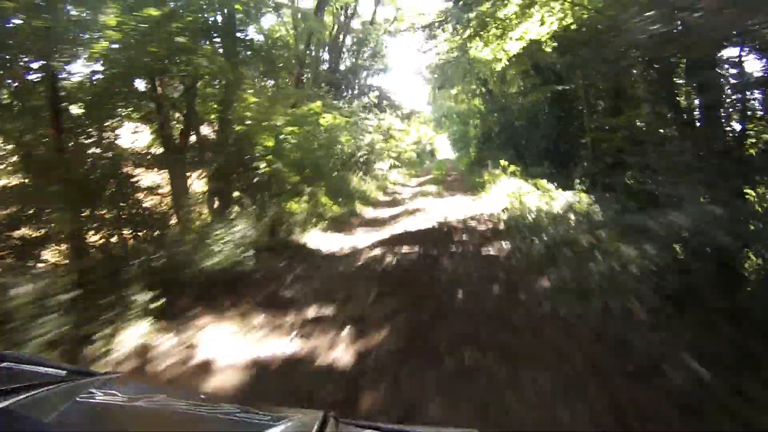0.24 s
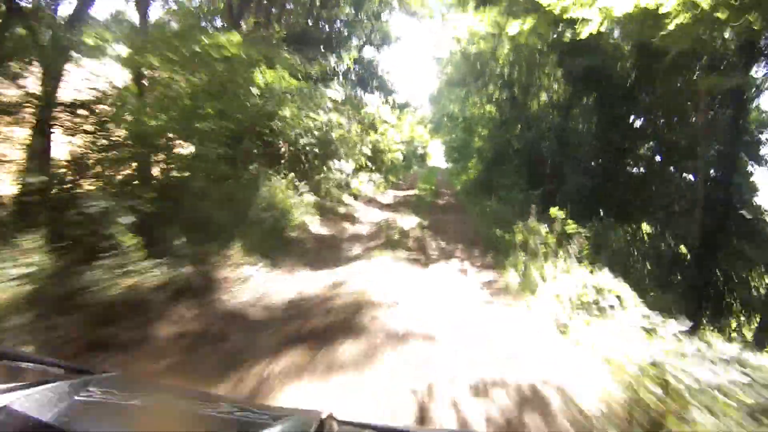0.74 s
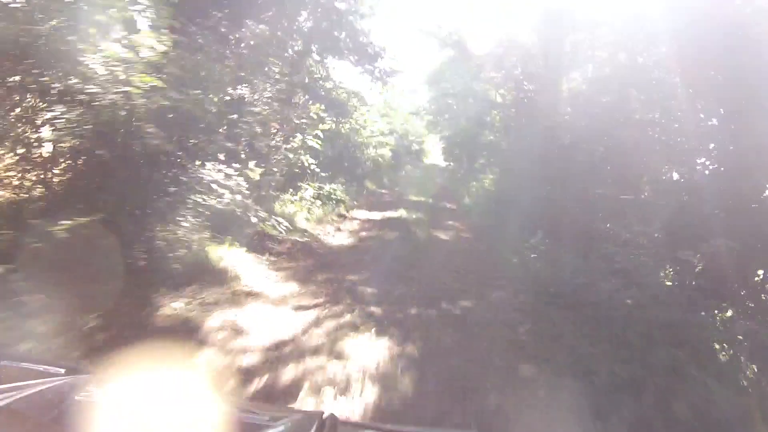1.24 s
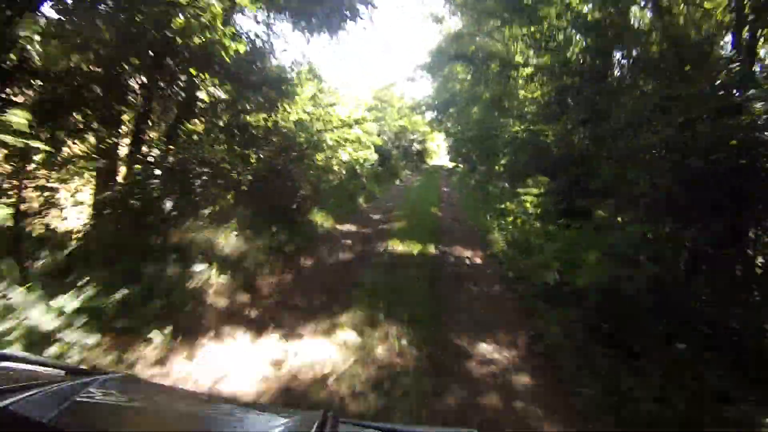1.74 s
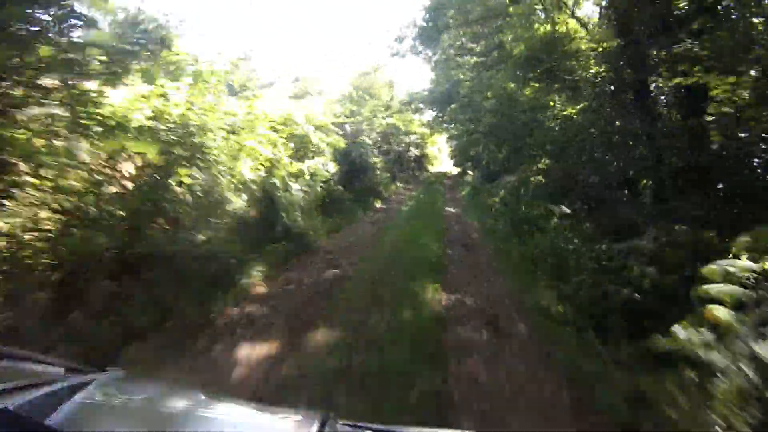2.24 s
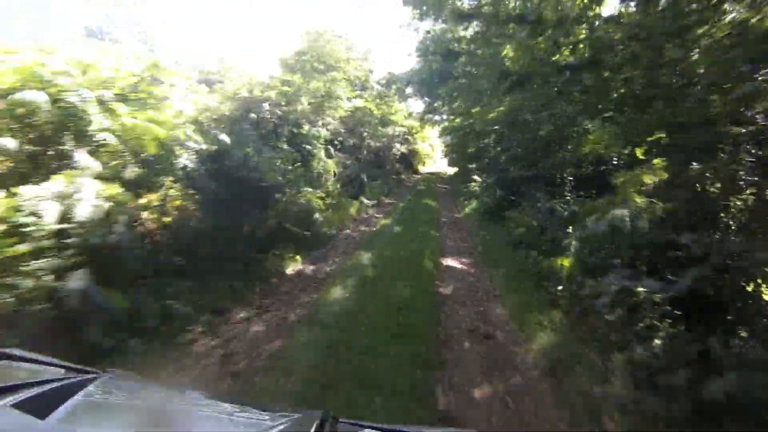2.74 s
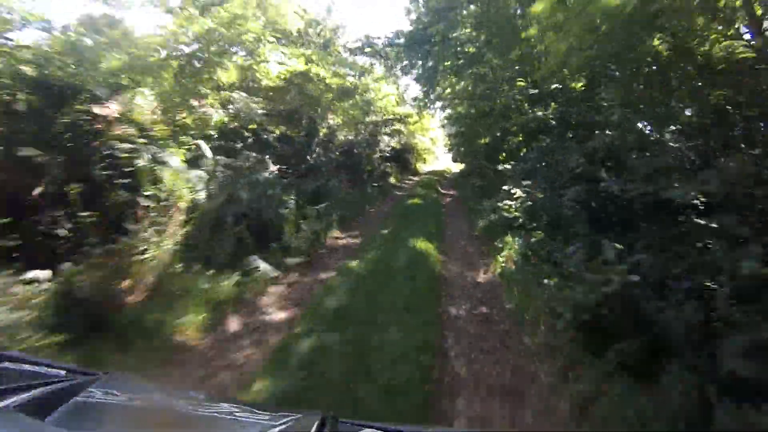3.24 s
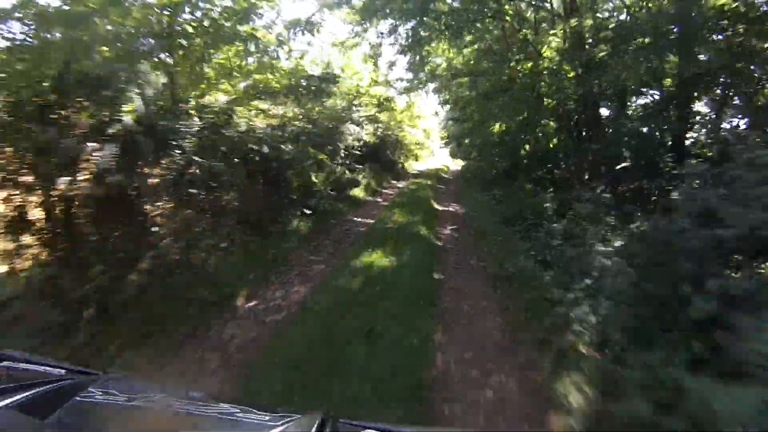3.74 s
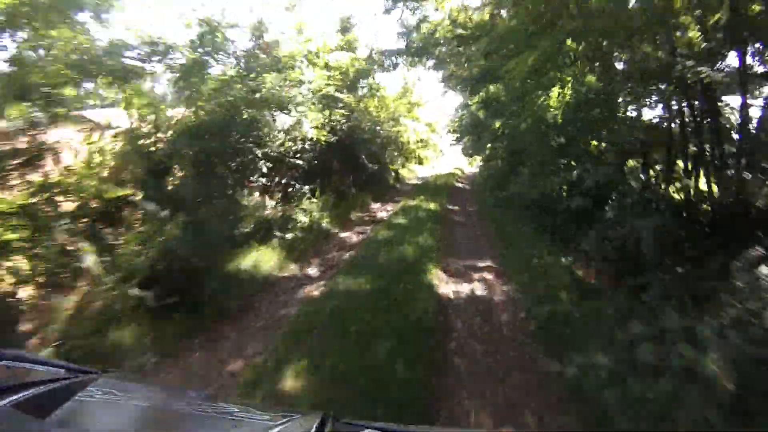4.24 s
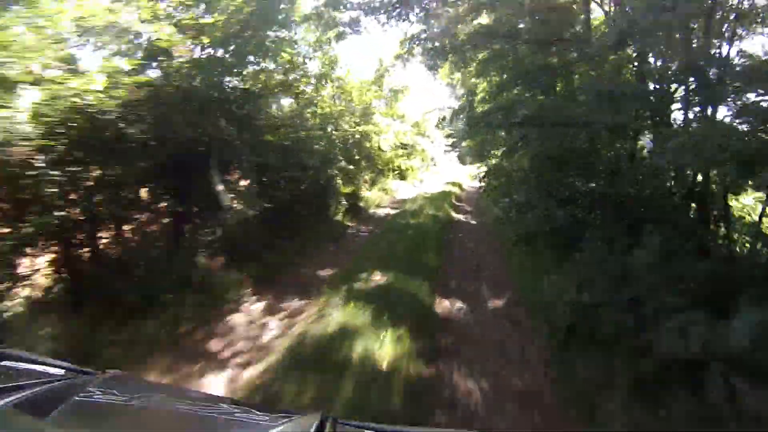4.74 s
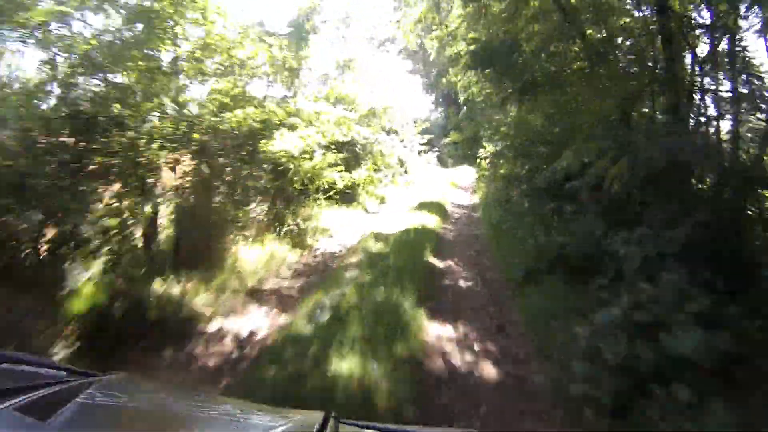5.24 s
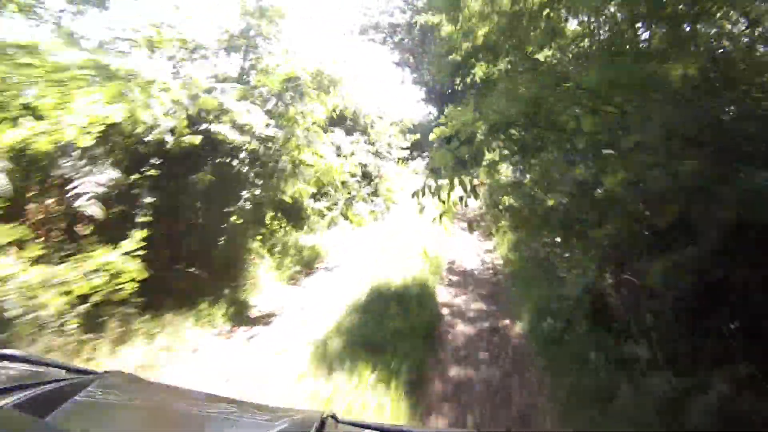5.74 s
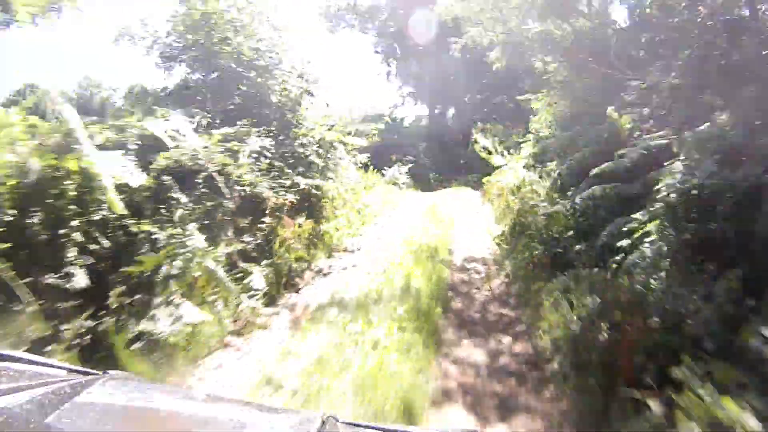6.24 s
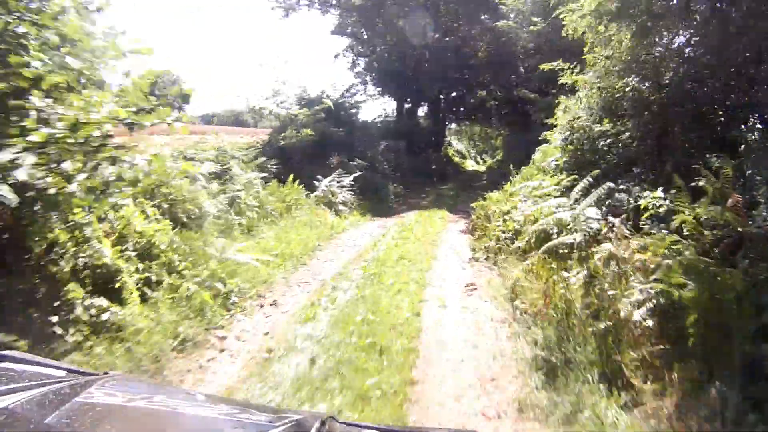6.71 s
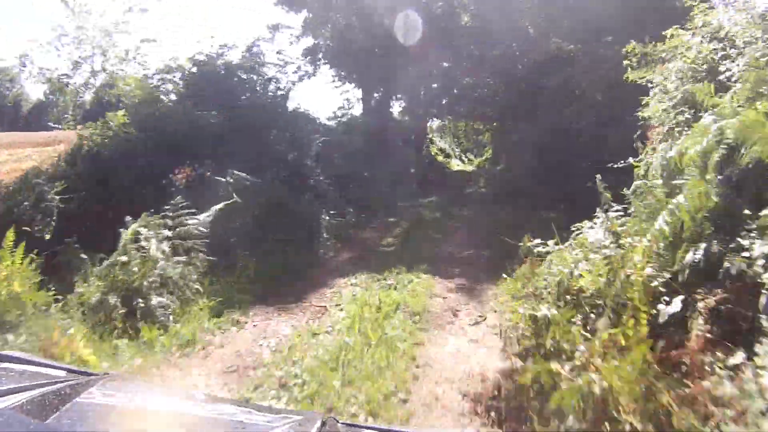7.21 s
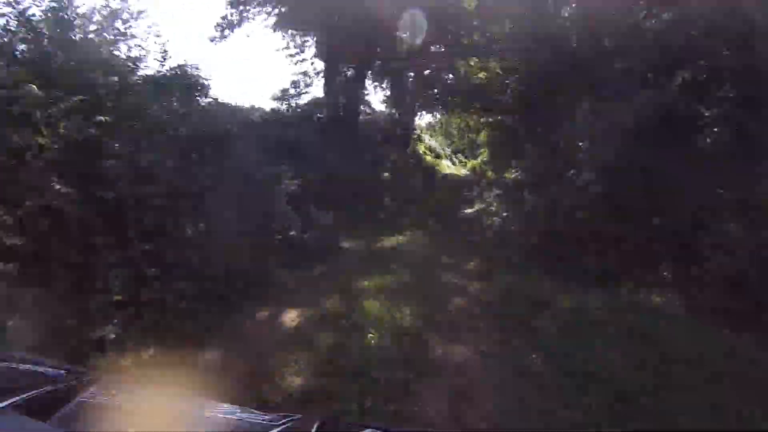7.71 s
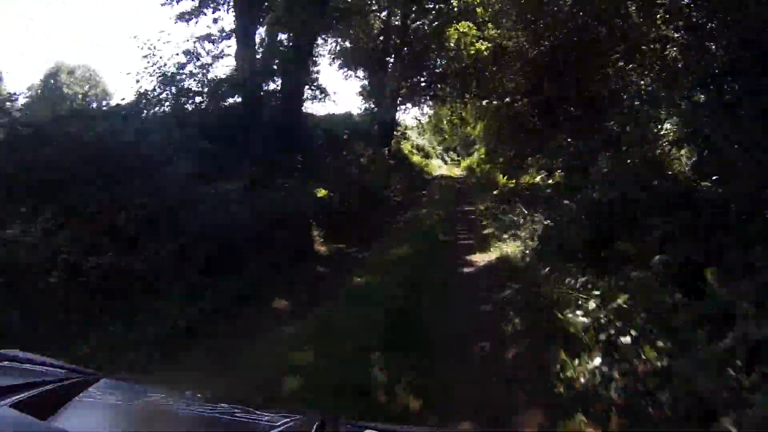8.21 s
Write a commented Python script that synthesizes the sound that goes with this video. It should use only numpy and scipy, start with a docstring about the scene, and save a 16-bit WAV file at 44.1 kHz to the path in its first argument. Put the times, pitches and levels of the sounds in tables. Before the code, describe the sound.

From on board an off-road vehicle on a rutted dirt track, a rough twin engine throbs close by, with a hollow bark, sheet-metal buzz, steady mechanical clatter and a gliding whine. At 0.3 and 0.6 s the suspension clunks hard as the throttle sound wavers. The engine then climbs until about 2.8 s, over deep body sway, tyre rumble and gritty ticks. Thuds and knocks cluster at 3.4 to 3.8 s while the revs fall; the engine dips quieter near 4 s and labours low until 5.2 s. Loose fittings tap at 1.1, 1.8, 5.3 and 6.5 s. Revs rise again, and at 5.9 s a very loud burst of hard clacks strikes beside the microphone; the rest ducks, then swells back over roughly a second. Further bumps and a stone tick come around 7.7 s as the engine pulls higher and louder until 8.5 s.

```python
"""The twin engine of an off-road vehicle on a dirt track, heard on board, turns at 30 to 43 cycles a second.
Its firings ring the pipe and sheet metal, low orders boom in the cab, high orders whine, the mechanism clatters.
The ground sways and jolts the body, the suspension clunks, fittings rattle and the tyres crunch grit:
filtered noise and decaying sines.
A hard clack close to the microphone makes the gain control duck, then recover."""
import sys
import numpy as np
from scipy import signal
from scipy.fft import rfft, irfft, next_fast_len
from scipy.io import wavfile
from scipy.ndimage import uniform_filter1d, minimum_filter1d, map_coordinates

SR = 44100
rng = np.random.default_rng(int(sys.argv[2]) if len(sys.argv) > 2 else 0)


def transcribe(signal):
    """Save signal, clipped to [-1, 1], as a 16-bit WAV file at the path in sys.argv[1]."""
    frames = np.atleast_2d(signal).T
    limited = np.clip(frames, -1, 1)
    pcm = np.round(limited * 32767).astype(np.int16)
    wavfile.write(sys.argv[1], SR, pcm)


N = 373514

# spectrum of clattering metal: hz, level_db (relative)
CLATTER_SPECTRUM = [(300, -9), (560, -3.5), (820, 2), (980, -3.5), (1130, -7), (1270, -6), (1380, 6.5),
                    (1950, -4), (3450, 0), (3900, -16), (4350, -6.5), (4900, -20.5), (5900, -15.5),
                    (7700, -27), (8800, -35.5), (13500, -42.5), (15000, -63)]


def amp(db):
    """Decibels to gain."""
    return 10 ** (np.asarray(db) / 20)


def unit(x):
    """Scale to rms 1."""
    return x / np.sqrt(np.mean(x ** 2) + 1e-20)


def curves(rows):
    """One value per sample for each column after the time."""
    s, *cols = np.transpose(rows)
    return [np.interp(np.arange(N) / SR, s, c) for c in cols]


def wobble(rate):
    """A smooth random curve through normal deviates, rate knots a second."""
    knots = rng.standard_normal(int(N * rate / SR) + 4)
    return map_coordinates(knots, [np.arange(N) * rate / SR])


def filtered(x, response):
    """x times a complex response of frequency."""
    m = next_fast_len(len(x) + SR // 2)
    spectrum = rfft(x, m) * response(np.fft.rfftfreq(m, 1 / SR))
    return irfft(spectrum, m)[:len(x)]


def coloured(x, points):
    """x through a (Hz, dB) spectrum, at rms 1."""
    hz, db = np.transpose(points)
    return unit(filtered(x, lambda f: amp(np.interp(np.log(f + 1), np.log(hz), db))))


def resonate(x, modes, order=1):
    """x through parallel (Hz, width Hz, dB) resonances, at rms 1; a higher order steepens their skirts."""
    def peak(f, hz, width_hz):
        return (1j * f * width_hz / (hz * hz - f * f + 1j * f * width_hz)) ** order

    return unit(filtered(x, lambda f: sum(amp(db) * peak(f, hz, width_hz) for hz, width_hz, db in modes)))


def noise():
    """White noise."""
    return rng.standard_normal(N)


def add(track, s, sound):
    """Mix a sound into the track at time s."""
    part = track[round(s * SR):][:len(sound)]
    part += sound[:len(part)]


def fade(t60):
    """A quarter second of exponential decay, losing 60 dB in t60 seconds."""
    return np.exp(-np.log(1000) * np.arange(SR // 4) / SR / t60)


def tone(hz):
    """A quarter second of a sine."""
    return np.sin(2 * np.pi * hz * np.arange(SR // 4) / SR)


def rolling():
    """Tyre noise: coloured noise of wandering level."""
    # hz, level_db (relative)
    tyre_spectrum = [(20, -9), (45, 11), (180, -1.5), (330, -4.5), (430, -17), (700, -9.5), (1150, -17),
                     (3000, -17), (5000, -35.5), (14000, -78)]
    return amp(-27.5 + 3.2 * wobble(7.6)) * coloured(noise(), tyre_spectrum)


def grit():
    """Grains thrown in flurries and single stones on the underside: short decays of bright noise."""
    # hz, level_db (relative)
    grit_spectrum = [(500, -25), (2500, 19), (4500, 0.5), (8000, 1), (13300, -4), (15300, -33)]
    # stones: start_s, level_db (relative)
    stones = [(0.4648, -43), (0.5477, -37), (0.5561, -36), (0.7043, -39), (0.7916, -43), (0.8036, -37),
              (1.0096, -43), (1.1054, -42), (1.1812, -36), (1.2645, -41), (1.3688, -38), (1.695, -35),
              (2.2099, -43), (2.5147, -43), (3.0849, -38), (3.3124, -42), (3.4101, -42), (3.4516, -41),
              (3.4994, -39), (3.7075, -39), (3.7299, -36), (3.7898, -41), (3.8372, -33), (4.1704, -41),
              (4.7551, -43), (4.768, -42), (4.781, -41), (4.788, -42), (4.9322, -40), (5.1447, -42),
              (5.1524, -40), (5.2315, -42), (7.0524, -39), (7.3652, -43), (7.456, -41), (7.7179, -31),
              (8.0781, -42), (8.2936, -43)]
    grains_per_s = 70 * amp(4 * wobble(4))
    size_db = np.minimum(5.5 * rng.exponential(size=N), 12)
    grains = (rng.random(N) < grains_per_s / SR) * amp(size_db)
    ticks = amp(-52) * signal.fftconvolve(grains, fade(t60=.009))[:N]
    for s, db in stones:
        add(ticks, s, amp(db + 7) * fade(t60=.013))
    return ticks * coloured(noise(), grit_spectrum)


def ping():
    """A brief high ping: one decaying sine."""
    # start_s, pitch_hz, peak_db, t60_s
    s, hz, db, t60 = (.207, 9300, -45, .08)
    track = np.zeros(N)
    add(track, s, amp(db) * fade(t60=t60) * tone(hz))
    return track


def rattles():
    """Each loose fitting taps once: a short ring with a little scrape."""
    # start_s, level_db (before the rise), ring_hz
    taps = [(1.085, -18, 3070), (1.765, -14, 1410), (5.311, -14, 1370), (6.421, -17, 1400),
            (6.575, -16, 2800)]
    rings, scrapes = np.zeros((2, N))
    for s, db, hz in taps:
        blow = amp(db) * (1 - fade(t60=.004)) * fade(t60=.035)
        add(rings, s, blow * tone(hz))
        add(scrapes, s, blow)
    return rings + .5 * scrapes * coloured(noise(), CLATTER_SPECTRUM)


def clunks():
    """The suspension hits its stop: short hard bursts of resonant noise."""
    # start_s, level_db (before the rise)
    stops = [(0.32, -16), (.618, -19)]
    # mode_hz, width_hz, level_db (relative)
    clunk_modes = [(300, 84, -0.5), (540, 180, -6), (1400, 410, -14)]
    blows = np.zeros(N)
    for s, db in stops:
        add(blows, s, amp(db) * (1 - fade(t60=0.0052)) * fade(t60=0.078))
    return blows * resonate(noise(), clunk_modes, order=2)


def body_sway():
    """The lowest body mode swings on at a wandering frequency and swells at each bump in the track."""
    # crest_s, level_db (relative), length_s at half height
    bumps = [(0.074, -13, 0.057), (0.31, -10, 0.11), (0.727, -9.5, 0.12), (0.924, -9.5, 0.05),
             (1.212, -9.5, 0.22), (1.443, -14.5, 0.16), (1.728, -9, 0.29), (2.046, -11.5, 0.19),
             (2.288, -9, 0.1), (2.6, -14, 0.06), (2.79, -13.5, 0.065), (2.932, -12, 0.039),
             (3.07, -8, 0.094), (3.345, -9.5, 0.037), (3.587, -8.5, 0.052), (3.886, -4, 0.083),
             (4.188, -11.5, 0.057), (4.317, -15.5, 0.068), (4.456, -10.5, 0.098), (4.605, -13, 0.11),
             (4.905, -8.5, 0.15), (5.148, -9.5, 0.085), (5.45, -8.5, 0.18), (5.755, -10.5, 0.068),
             (5.88, -13, 0.035), (6.133, -10.5, 0.19), (6.37, -13, 0.098), (6.574, -8, 0.068),
             (7.11, -10, 0.096), (7.366, -18, 0.1), (7.516, -9, 0.14), (7.706, -7.5, .06),
             (7.824, -6, 0.08), (7.972, -10, 0.043), (8.428, -11.5, 0.22)]
    t = np.arange(N) / SR
    swells = sum(amp(db) * .5 ** ((2 * (t - s) / length_s) ** 2) for s, db, length_s in bumps)
    steady = amp(-22.5 + 3 * wobble(6.5))
    swing_hz = 38.5 + 3.51 * wobble(12)
    swing = np.sin(2 * np.pi * np.cumsum(swing_hz) / SR)
    rumble = 0.29 * resonate(noise(), [(33.1, 25.6, 0)], order=3)
    return amp(1.0) * np.hypot(swells, steady) * (swing + rumble)


def shaking():
    """The ground's roughness drives the cab air and the body panels, resonances fed with noise."""
    # time_s, cab_db, panel_db
    ground = [(0.0, -26, -26.5), (2.4, -22, -26.5), (4.0, -23.5, -26.5), (5.8, -20, -25), (7.1, -23.5, -24),
              (8.47, -23.5, -26)]
    # mode_hz, width_hz, level_db (relative)
    cab_modes, panel_modes = [(103.1, 14.5, 0.5), (132.1, 24.4, -3)], [(244, 52.4, -2), (276.1, 46.5, -0.5)]
    cab_db, panel_db = curves(ground)
    rough_db = wobble(6.7)
    cab = amp(cab_db + rough_db) * resonate(noise(), cab_modes, order=2)
    # separate noise for each panel
    panels = unit(sum(amp(db) * resonate(noise(), [(hz, width_hz, 0)], order=2)
                      for hz, width_hz, db in panel_modes))
    return cab + amp(panel_db + rough_db) * panels


def jolts():
    """Blows to the chassis knock the panels and thud in the cab air: decaying sines and a slap of noise."""
    # start_s, knock_db, thud_db (both relative)
    blows = [(0.32, -9, -15), (.582, -6.5, -17), (.612, -15, -13), (0.967, -28, -10), (1.078, -31, -16),
             (1.144, -36, -9.5), (1.673, -18, -24), (1.976, -13, -28), (2.566, -16, -11.5),
             (2.613, -10, -26), (2.767, -11.5, -28), (3.009, -20, -20), (3.409, -19.5, -18),
             (3.44, -23, -9.5), (3.497, -18, -10), (3.701, -9.5, -8.5), (3.736, -23, -11),
             (3.773, -29, -10), (4.756, -23, -9), (5.039, -17, -33), (5.397, -19, -32), (5.6, -14, -28),
             (5.806, -15, -23), (6.665, -13, -14), (7.392, -17, -19), (7.706, -20, -10)]
    # panel_hz, level_db (relative)
    knock_modes = [(225, -5.5), (266, 4), (312, -9.5)]
    thud_hz, pitch_spread = 121.8, 0.044  # spread as a share of the pitch
    slaps, rings = np.zeros((2, N))
    # the suspension softens the start of each blow
    rise = 1 - fade(t60=0.043)
    for s, knock_db, thud_db in blows:
        detune = 1 + pitch_spread * rng.standard_normal(1 + len(knock_modes))
        knock = amp(knock_db) * rise * fade(t60=0.11)
        thud = amp(thud_db) * rise * fade(t60=0.2)
        ring = sum(amp(db) * tone(hz * d) for (hz, db), d in zip(knock_modes, detune[1:]))
        add(rings, s, 1.15 * knock * ring + 1.5 * thud * tone(thud_hz * detune[0]))
        add(slaps, s, knock)
    slap_noise = resonate(noise(), [(298, 190, -1.0), (543, 400, -8)], order=2)
    return rings + amp(-12.5) * slaps * slap_noise


def clack():
    """Ten hard contacts near the microphone within 35 ms: sines, cracks, overtones and a brief frame ring."""
    # start_s, level_db (relative), ring_hz, ring_t60_s, crack_db and overtone_db (over level_db)
    contacts = [(5.9032, 12.5, 4100, .018, -4.5, -10), (5.9055, 6, 4300, .01, 2.5, -4),
                (5.9075, 8, 2450, .022, -3, -5), (5.9128, 17.5, 2250, .022, -9, -24),
                (5.9158, 4, 2700, .02, 0, -16), (5.9222, 5.5, 2100, .016, -4, -20),
                (5.9261, 5, 1700, .02, 3.5, -9), (5.929, 14.5, 4450, .012, -4.5, -22),
                (5.9362, 2.5, 4500, .009, -4, -20), (5.9378, 8.5, 1850, .014, -12, -30)]
    # overtone_hz, width_hz, level_db (relative)
    overtone_modes = [(9650, 850, 1), (12280, 930, -1)]
    # hz, level_db (relative)
    crack_spectrum = [(200, -2), (1000, -6.5), (3500, -2), (5000, -12.5), (6200, -9.5), (10000, -20),
                      (14000, -25), (16000, -42)]
    rings, cracks, bright, tail = np.zeros((4, N))
    for s, db, hz, t60, crack_db, overtone_db in contacts:
        add(rings, s, amp(db + 2.5) * (1 - fade(t60=.001)) * fade(t60=t60) * tone(hz))
        add(cracks, s, amp(db + crack_db + 1) * (fade(t60=0.017) + 0.02 * fade(t60=0.15)))
        add(bright, s, amp(db + overtone_db) * fade(t60=.018))
        add(tail, s, amp(db - 23) * fade(t60=0.091))
    overtones = bright * resonate(noise(), overtone_modes, order=2)
    crack = cracks * coloured(noise(), crack_spectrum)
    frame = tail * resonate(noise(), [(2430, 490, 0)])
    return amp(-6.5) * (rings + overtones + crack + frame)


def clatter(clatter_db, strokes):
    """The mechanism's coloured noise, a little harder on each stroke."""
    level_db = clatter_db + 0.3 + 0.77 * wobble(25) + 1.04 * wobble(110)
    return amp(level_db) * coloured(noise() * (1 + 0.25 * strokes), CLATTER_SPECTRUM)


def whine(speed_hz, cycle):
    """High engine orders sing as they glide through resonances; random phase and level roughen them."""
    # order, level_db (relative)
    note_orders = [(16, 4), (17, -1.5), (18, 3.5), (19, 3), (20, -2.5), (21, 1.5), (22, -5), (23, -8.5),
                   (24, -4), (25, -0.5), (26, -1), (27, -5), (28, -10), (29, -4), (30, 8)]
    # resonance_hz, width_hz (at -6 dB), level_db (relative)
    singing = [(601, 40, -12.5), (753, 29, 0.5), (788, 48, -2), (865, 46, 2.5), (908, 16.6, -10)]
    grid_hz = np.arange(1500)
    power = sum(amp(2 * db) / (1 + (2 * (grid_hz - hz) / width_hz) ** 2) ** 2 for hz, width_hz, db in singing)
    gains = np.sqrt(power)
    note = np.zeros(N)
    for k, db in note_orders:
        level_db = -9.5 + db + 2.5 * wobble(9) + 1.4 * wobble(45)
        jitter_rad = .43 * (wobble(18) + wobble(70))
        phase = 2 * np.pi * round(k) * cycle + jitter_rad
        note += np.interp(round(k) * speed_hz, grid_hz, gains) * amp(level_db) * np.sin(phase)
    return note


def boom(speed_hz, cycle, bark_db):
    """Low orders as sines: the first and third follow the bark, the others swell at cab resonances."""
    # order, resonance_hz, width_hz (at -3 dB), on_db, away_db
    cab_boom = [(2, 74.9, 5.7, -20.5, -36), (4, 133.3, 6.1, -20.5, -33)]
    orders = [(1, amp(bark_db + 4.5)), (3, amp(bark_db - 5))]
    for k, hz, width_hz, on_db, away_db in cab_boom:
        detune = 2 * (round(k) * speed_hz - hz) / width_hz
        orders.append((round(k), np.hypot(amp(on_db) / np.hypot(1, detune), amp(away_db))))
    total = np.zeros(N)
    for k, gain in orders:
        sine = np.sqrt(2) * np.sin(2 * np.pi * (k * cycle + rng.random()))
        total += gain * amp(1.7 * wobble(9.7) - 0.84) * sine
    return total


def firings(cycle, scatter_db, jitter_s):
    """One impulse per engine cycle, uneven in size and time."""
    at = np.flatnonzero(np.diff(np.floor(cycle)) > 0)
    size, late = rng.standard_normal((len(at), 2)).T
    at = np.clip(np.round(at + late * jitter_s * SR), 0, N - 1).astype(int)
    return np.bincount(at, amp(scatter_db * size), N)


def bark_and_buzz(cycle, second, strokes, bark_db):
    """Firing impulses and puffs of turbulent gas ring the pipe (bark) and the sheet metal (buzz)."""
    # mode_hz, width_hz, level_db (relative)
    pipe_modes, sheet_modes = [(282.8, 47, 8), (538, 66, 4.5), (754, 44.6, 13), (861, 49, 16)], [(1201, 51, -3.5), (1351.4, 69, 7.5), (1480, 99, -1)]
    first_pulses = firings(cycle, scatter_db=1.5, jitter_s=.00005)
    second_pulses = firings(second, scatter_db=1.5, jitter_s=.00005)
    pulses = unit(first_pulses + .7 * second_pulses)

    def drive():
        return pulses + 1.2 * unit(noise() * strokes)

    bark = amp(bark_db - 1.5) * resonate(drive(), pipe_modes, order=2)
    buzz = amp(bark_db - 7) * resonate(drive(), sheet_modes, order=2)
    return bark + buzz


def engine():
    """Two uneven strokes a cycle drive the bark, buzz and clatter; sines at engine orders boom and whine."""
    # time_s, speed_hz (engine cycles)
    speed_curve = [(0.0, 31.8), (0.2, 31.56), (0.4, 32.7), (0.8, 33.6), (1.0, 33.3), (1.22, 33.35),
                   (1.6, 35.4), (1.8, 36.1), (2.15, 37.0), (2.8, 37.96), (3.0, 37.85), (3.2, 37.3),
                   (3.39, 36.1), (3.6, 34.1), (3.79, 33.1), (4.19, 31.0), (5.19, 30.2), (5.6, 31.1),
                   (5.99, 33.6), (6.42, 36.9), (7.38, 38.7), (7.98, 40.65), (8.25, 42.3), (8.47, 43.2)]
    # time_s, bark_db, clatter_db (both relative)
    load_curve = [(0.0, -41.5, -31), (0.29, -31, -27), (0.37, -46, -30), (0.44, -27, -29),
                  (0.73, -35.5, -28), (1.09, -29.5, -26.5), (1.17, -30, -27.5), (3.1, -28, -28.5),
                  (3.74, -30, -26.5), (3.88, -36.5, -27.5), (4.04, -43, -33.5), (4.1, -30, -28.5),
                  (5.55, -31.5, -29.5), (5.87, -26.5, -27), (6.8, -26.5, -30.5), (7.45, -25.5, -28.5),
                  (7.95, -29.5, -29.5), (8.15, -26, -27.5), (8.44, -22.5, -25.5)]
    speed_hz, = curves(speed_curve)
    bark_db, clatter_db = curves(load_curve)
    cycle = np.cumsum(speed_hz) / SR
    second = cycle - .46  # the second stroke comes at 46 % of the cycle
    strokes = np.exp(-14 * (cycle % 1)) + .8 * np.exp(-14 * (second % 1))
    # two swells a cycle, one the stronger
    angle = 2 * np.pi * (cycle - .05)
    throb = unit(1 + .4 * np.cos(2 * angle) + .2 * np.cos(angle))
    throbbing = throb * bark_and_buzz(cycle, second, strokes, bark_db)
    singing_note = amp(bark_db) * throb ** 2 * whine(speed_hz, cycle)
    return boom(speed_hz, cycle, bark_db) + throbbing + singing_note + clatter(clatter_db, strokes)


def scene():
    """Everything as it reaches the microphone on board."""
    ground = rolling() + grit() + ping()
    body = rattles() + clunks() + body_sway() + shaking() + jolts()
    return (ground + body + clack() + engine())[None]


def gain_control(x, ceiling_db, recover_db_per_s, size=200):
    """Peaks over the ceiling pull the gain down within size samples; it returns at a steady dB rate."""
    # moving maximum
    peaks = -minimum_filter1d(-np.abs(x), size)
    excess_db = np.maximum(20 * np.log10(peaks + 1e-9) - ceiling_db, 0)
    ramp_db = recover_db_per_s * np.arange(N) / SR
    cut_db = np.maximum.accumulate(excess_db + ramp_db) - ramp_db
    return x * amp(-uniform_filter1d(cut_db, size))


def record(dry):
    """Gain control, then the recorder's band limit."""
    held = gain_control(dry[0], ceiling_db=-.6, recover_db_per_s=14.5)
    top_hz = 15300
    return filtered(held, lambda hz: hz < top_hz)[None]


dry = scene()
out = record(dry)
transcribe(out)
```